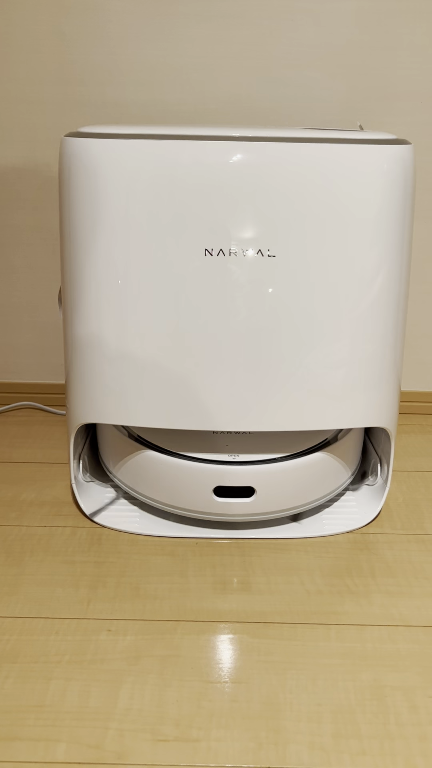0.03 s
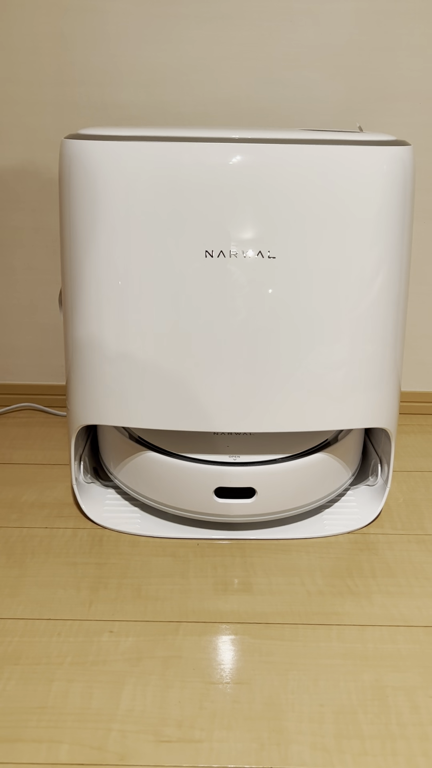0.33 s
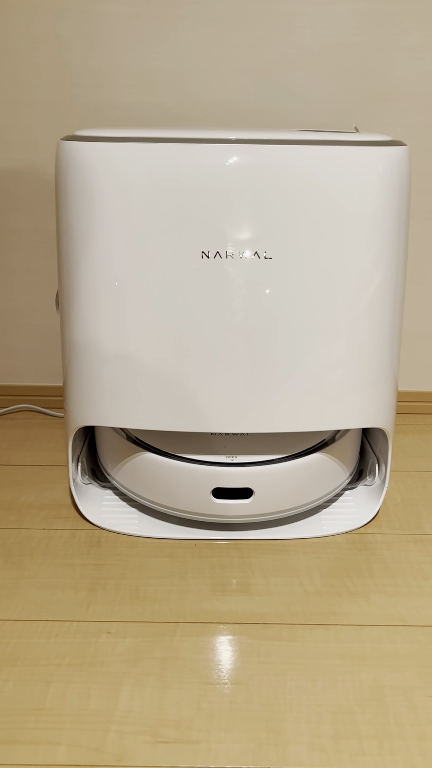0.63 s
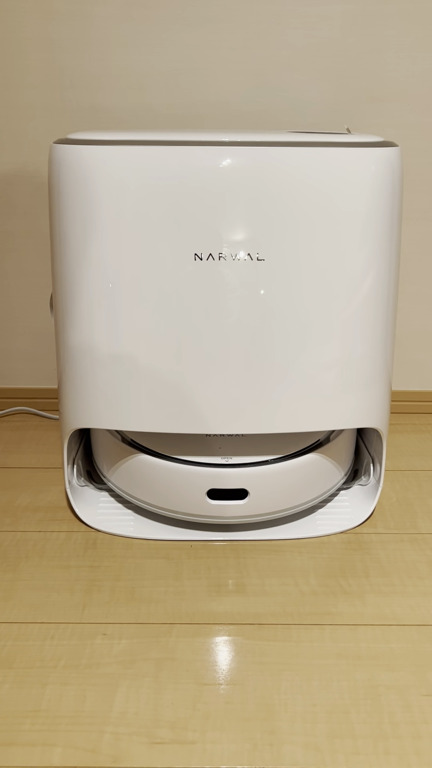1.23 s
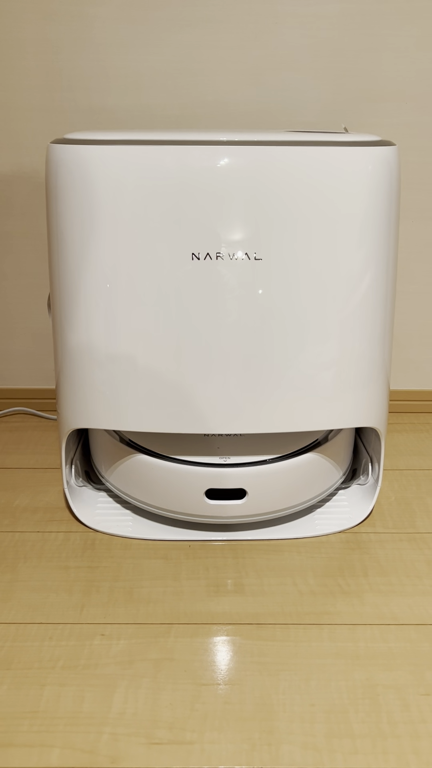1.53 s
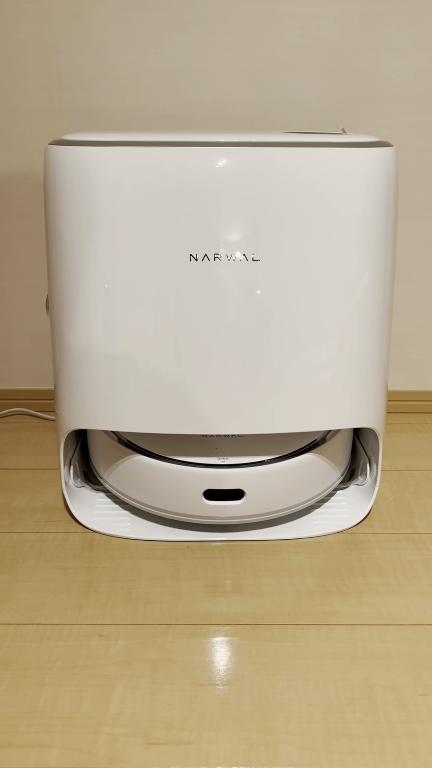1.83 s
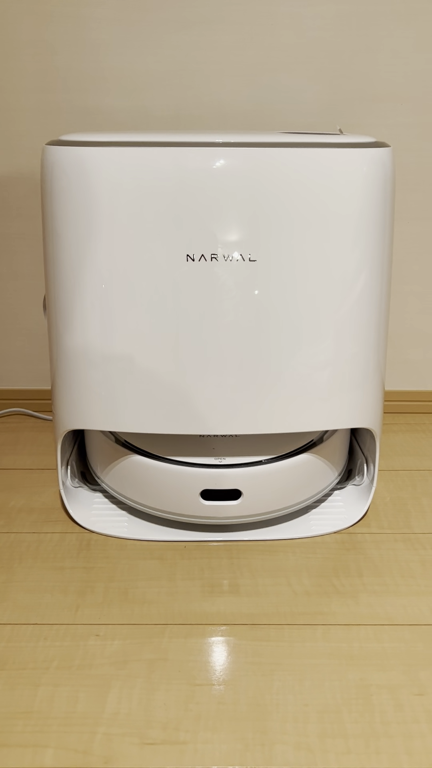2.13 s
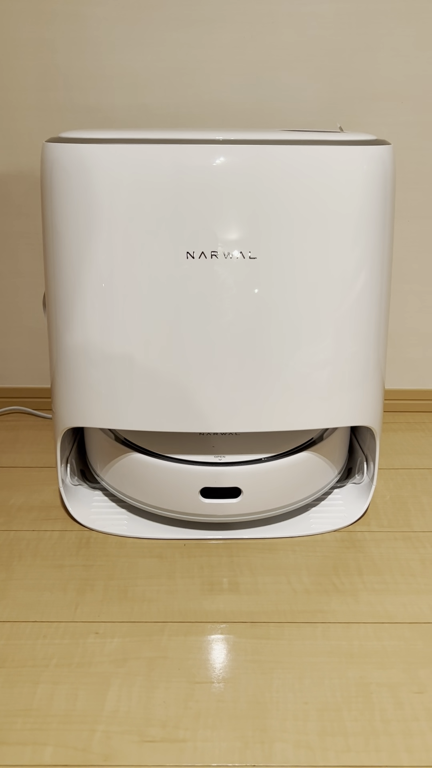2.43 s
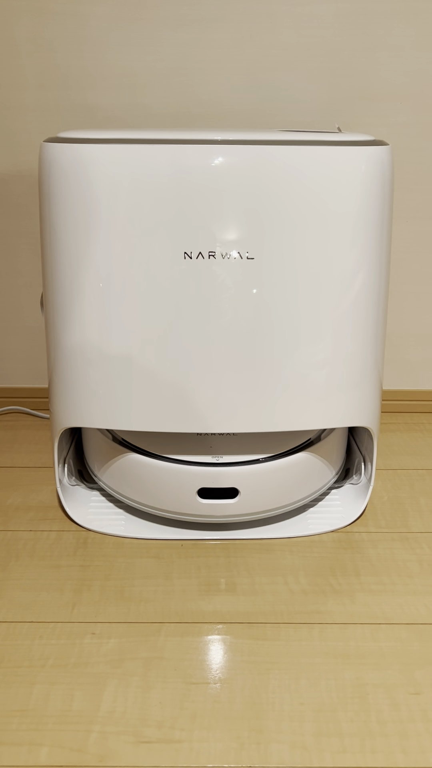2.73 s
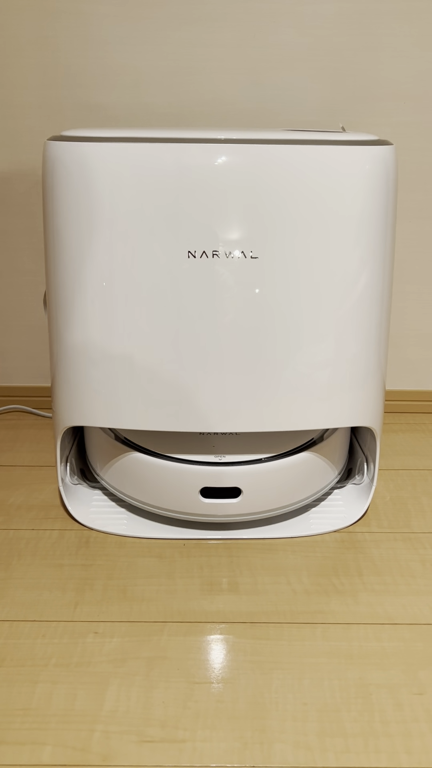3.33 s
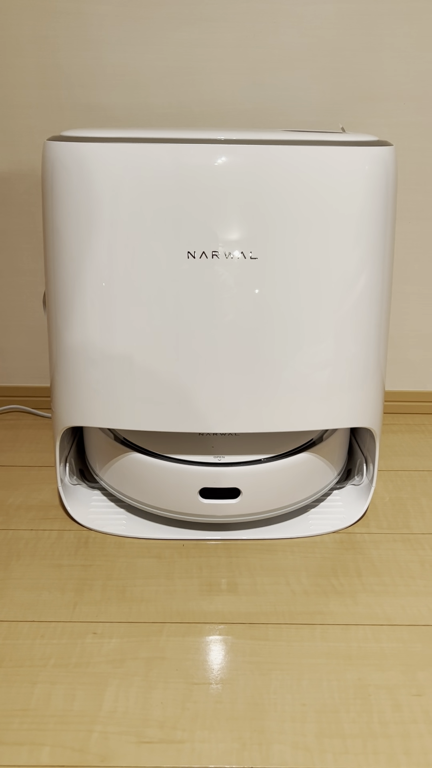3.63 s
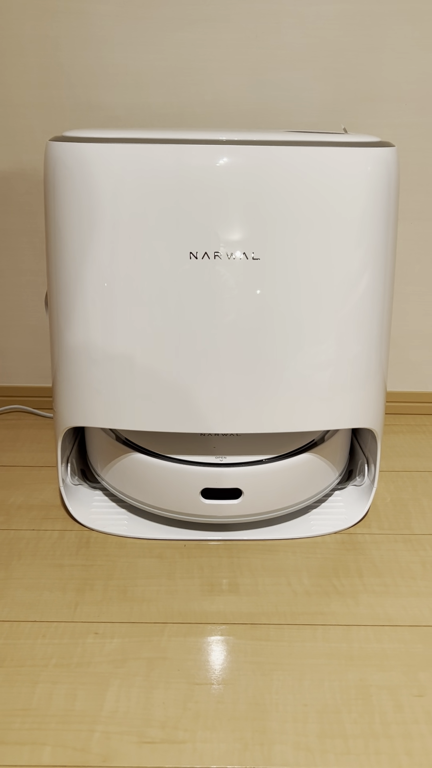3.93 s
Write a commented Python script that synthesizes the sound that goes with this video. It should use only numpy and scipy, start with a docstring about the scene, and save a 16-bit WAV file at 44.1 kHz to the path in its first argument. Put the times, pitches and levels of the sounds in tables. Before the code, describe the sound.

A robot vacuum's dock winds down with falling fan whines and a dying rush of air. Two plastic clunks follow, then a small pump whines and fizzes as water rumbles louder into a hollow tank in a quiet room.

```python
"""Falling whines over a dying rush of air: two fans coast down in a robot vacuum's dock, their tones
lighting up the resonances of the duct. An early knock and, as the fans stop, two clunks ring the plastic
shell. A small pump motor starts up with whining gears and fizzing brushes, and water rumbles ever louder
into a hollow tank, bubbling and splashing. A quiet room lies underneath."""
import sys
import numpy as np
from scipy import signal
from scipy.io import wavfile
from scipy.ndimage import uniform_filter1d, map_coordinates

SR = 44100
rng = np.random.default_rng(int(sys.argv[2]) if len(sys.argv) > 2 else 0)


def master(y):
    """Save y as 16-bit WAV."""
    cut = np.clip(np.atleast_2d(y).T, -1, 1)
    pcm = np.round(cut * 32767)  # scale
    wavfile.write(sys.argv[1], SR, pcm.astype(np.int16))


N = 176400
T = np.arange(N) / SR

# first fan coasting down: t/s, speed/(turns/s)
FAN_SPEED = [(0, 470), (.15, 420), (.3, 379), (.5, 337), (.7, 299), (.9, 274), (1.1, 236), (1.2, 218),
             (1.4, 184), (1.6, 150), (1.8, 118.3), (1.9, 104.5), (2.1, 82)]
# duct resonances that each fan's harmonics sweep through: harmonic, f/Hz, width/Hz, level/dB
FIRST_FAN_TONES = [(5, 1690, 110, -64.5), (5, 1440, 28, -64), (5, 1385, 70, -53.5), (5, 1308, 83, -63),
                   (5, 716, 190, -71.5), (6, 1362, 176, -66.5), (9, 3500, 500, -68.5), (9, 3130, 260, -66),
                   (9, 2660, 700, -76.5), (9, 2070, 380, -73.5), (9, 1696, 81, -68), (9, 1140, 290, -73.5),
                   (14, 3130, 380, -77.5), (14, 1356, 180, -73.5), (18, 7000, 760, -79),
                   (18, 5300, 520, -82), (18, 4380, 690, -88), (18, 3780, 290, -81), (18, 3440, 300, -80),
                   (18, 3116, 260, -73.5), (18, 2130, 270, -74.5), (27, 3160, 700, -86)]
SECOND_FAN_TONES = [(9, 3500, 280, -70.5), (9, 3130, 620, -69), (9, 1660, 190, -72.5), (9, 1403, 74, -63),
                    (9, 1311, 70, -62)]
# fades of the air rush, suction hiss and bearings: t/s, level/dB
RUSH_FADE = [(0, -51.5), (.2, -54), (.5, -57), (.9, -61), (1.2, -67.5), (1.5, -74), (1.9, -76),
             (2.2, -78.5), (2.4, -120)]
HISS_FADE = [(0, -59), (.13, -58), (.17, -62.5), (.3, -68.5), (.5, -76.5), (1.2, -120)]
BEARING_FADE = [(0, -65), (.5, -74.5), (1.1, -80), (1.95, -90), (2.2, -110)]
# colours of the rush, hiss and room tone: f/Hz, gain/dB
RUSH_COLOUR = [(45, -16), (75, 4.5), (110, -4), (240, 7), (340, -4), (520, 8), (640, -2), (900, 3.5),
               (1300, -3.5), (1900, -13), (3100, -9.5), (4300, -37), (9000, -23.5)]
HISS_COLOUR = [(1500, -9), (2600, 6), (3700, -4), (4800, -6), (6000, 0.5), (8000, -1.5), (10000, -4.5),
               (12500, 2.5)]
ROOM_COLOUR = [(25, 1), (50, 11.5), (80, 7), (130, 3), (300, -10), (900, -40), (2000, -8), (4000, -23.5),
               (8000, -22), (12500, -23)]
# bearing resonances, per filter pass: f/Hz, width/Hz, gain/dB
BEARING_RINGS = [(8145, 350, -1), (8794, 230, -0.95)]

# plastic contacts: t/s, relative level/dB, low-pass/Hz, low cut/Hz, tick gain/dB
CONTACTS = [(.329, -38, 1100, 298, -45), (2.012, -33, 1370, 425, -22.5), (2.019, -34.5, 1050, 285, -26),
            (2.0322, -33.5, 670, 280, -35), (2.2196, -41.5, 870, 230, -42), (2.221, -29, 294, 122, -64)]
# modes of the shell: f/Hz, gain/dB, t60/s
SHELL_MODES = [(158, -9, 0.13), (256, 0, 0.06), (329, -2.5, 0.106), (393, -7.5, 0.11), (521, -2.5, 0.075),
               (612, -7, 0.11), (693, -2.5, 0.056), (842, -6, 0.09), (924, -5, 0.072), (1040, -5.5, 0.058),
               (1247, -4, 0.03), (1597, -13, 0.06), (2260, -15, 0.032)]

# pump motor: t/s, speed/(turns/s)
PUMP_SPEED = [(2.21, 84), (2.26, 91), (2.316, 92.6), (2.43, 90), (2.48, 92), (2.53, 96), (2.62, 99),
              (2.7, 97.3), (2.82, 93.6), (2.99, 90), (3.15, 88.4), (3.3, 87.7), (3.5, 88), (4, 87)]
# envelopes of the gear whine and brush fizz: t/s, level/dB
WHINE_LEVEL = [(2.22, -83), (2.31, -60.5), (2.45, -61), (2.53, -68.5), (2.62, -85), (2.69, -63),
               (2.82, -74), (2.9, -66), (3, -59.5), (3.25, -60), (3.47, -61), (3.6, -64), (3.72, -75)]
FIZZ_LEVEL = [(2.2, -69), (2.6, -66.5), (3.1, -69.5), (3.65, -69), (3.8, -75.5), (4, -103)]
# shaft tones: harmonic, level/dB
SHAFT_TONES = [(1, -82), (5, -75.5), (6, -73), (9, -75), (13, -84.5), (21, -81), (22, -92)]
# resonance that a high overtone reaches near top speed: f/Hz, width/Hz, level/dB
SING_RESONANCE = [(3843, 60, -75.5)]
# motor casing resonances: f/Hz, width/Hz, gain/dB
CASING_RINGS = [(2360, 980, -8.5), (3860, 45, 0.5), (4710, 120, -5), (5090, 100, 1.5), (5580, 400, 0),
                (6510, 155, 2), (7770, 380, 4), (9210, 200, -12), (11100, 540, -15.5)]

# swells of the water's rumble and splash: t/s, level/dB
RUMBLE_SWELL = [(2.2, -110), (2.26, -63.5), (2.4, -72.5), (2.55, -70), (2.8, -73.5), (3.02, -65),
                (3.12, -50), (3.2, -55), (3.33, -48.5), (3.52, -47.5), (3.7, -42), (4, -41.5)]
SPLASH_SWELL = [(2.2, -110), (2.27, -71), (2.95, -69), (3.12, -62.5), (3.22, -62), (3.35, -59.5),
                (3.75, -56), (4, -54)]
# their colours: f/Hz, gain/dB
RUMBLE_COLOUR = [(38, -31), (55, -5), (78, -2), (100, 1.5), (135, -1), (200, -2), (280, 1.5), (350, -2),
                 (480, -7.5), (700, -16.5), (1400, -27.5)]
SPLASH_COLOUR = [(300, -24), (550, 0.5), (900, 1), (1400, -4.5), (2000, -10), (3000, -10.5), (4200, -21),
                 (6500, -22), (9000, -36), (12500, -22.5)]

# stereo image of the noise beds: f/Hz, left-right correlation
LIKENESS = [(60, .985), (125, .9), (250, .78), (500, .6), (1000, .65), (4000, .7), (7500, .75), (9500, -.2),
            (11500, -.8)]
# their balance: f/Hz, left minus right/dB
AIR_BALANCE = [(100, 0.75), (500, 3.8), (2000, 4.2), (5000, 0.83), (9000, 0.57)]
WATER_BALANCE = [(100, 0.24), (250, 0.57), (600, 3), (2000, 3.9), (8000, 0.74)]

SECOND_FAN_RATIO, FAN_STOP_S, TURBULENCE_TURNS = 1.052, 2.03, .035
CRACK_DB, CRACK_T60_S, TICK_T60_S = 2.5, .091, .16
PUMP_START_S, PUMP_RISE_S, GEAR_TEETH, COMMUTATOR_SEGMENTS = 2.215, .04, 11, 3
BRUSH_BOUNCE_TURNS, FAN_FLUTTER_DB, PUMP_FLUTTER_DB = .0003, 2.5, 6
BUBBLES_PER_S, BUBBLE_T60_CYCLES, BUBBLE_DB, CHURN_DB = 92, 12, -4.5, -1.5
ROOM_TONE_DB, ROOM_T60_S, ROOM_WET_DB = -74.5, .26, -7.5


def from_db(db):
    return 10 ** (np.asarray(db) / 20)


def unit_rms(x):
    return x / np.sqrt(np.mean(x ** 2) + 1e-20)


def in_time(rows):
    return np.interp(T, *np.transpose(rows))


def at_hz(rows, hz):
    freqs, values = np.transpose(rows)
    return np.interp(np.log(hz), np.log(freqs), values)


def pan(db):
    return from_db(np.array([[db], [-db]]) / 2)


def decay(t, t60):
    return np.exp(-np.log(1000) * t / t60)


def butter(x, hz, kind, order=2):
    sos = signal.butter(order, np.clip(hz, 10, .45 * SR), kind, fs=SR, output="sos")
    return signal.sosfilt(sos, x + 1e-18)


def drift(hz):
    """Smooth random modulator of rms 1, rolling off above hz."""
    hop, settle = 40, 2000
    pole = np.exp(-2 * np.pi * hz * hop / SR)
    white = rng.standard_normal(N // hop + settle + 2)
    slow = signal.lfilter([1], [1, -2 * pole, pole * pole], white)[settle:]
    return np.interp(np.arange(N) / hop, np.arange(len(slow)), unit_rms(slow))


def ring(clicks, hz, t60):
    """Each click sets a damped sine ringing."""
    r, w = decay(1 / SR, t60), 2 * np.pi * hz / SR
    return signal.lfilter([0, np.sin(w)], [1, -2 * r * np.cos(w), r * r], clicks + 1e-18)


def resonate(x, rows):
    """Parallel resonators of alternating polarity."""
    return sum((-1) ** k * from_db(db) * signal.lfilter(*signal.iirpeak(hz, hz / width, fs=SR), x)
               for k, (hz, width, db) in enumerate(rows))


def stereo_noise(pair, alike):
    """Two unrelated noises, mixed as mid and side to a given correlation."""
    mid, side = pair
    return np.sqrt(1 + alike) * mid + np.sqrt(1 - alike) * side * np.array([[1], [-1]])


def noise_bed(colour, balance, flicker_db, flicker_hz):
    """Stereo noise in narrow bands, each flickering partly on its own; mid rms 1."""
    edges = np.geomspace(colour[0][0], colour[-1][0], 2 * len(colour) + 1)
    out, together, white = 0, drift(flicker_hz), rng.standard_normal((2, 2, N))
    for k, band in enumerate(zip(edges, edges[1:])):
        hz = np.sqrt(band[0] * band[1])
        gain = from_db(at_hz(colour, hz) + flicker_db * (.5 * together + drift(flicker_hz)))
        noise = stereo_noise(butter(white[k % 2], band, "band", order=3), at_hz(LIKENESS, hz))
        out += gain * pan(at_hz(balance, hz)) * noise
    return out / np.std(out.mean(axis=0))


def shaft_turns(speed, wobble):
    """Shaft angle in turns, slightly unsteady."""
    return np.cumsum(speed * (1 + wobble * drift(33.7))) / SR


def tone(turns, harmonic):
    return np.sqrt(2) * np.sin(2 * np.pi * (harmonic * turns + rng.random()))


def in_room(x, wet_db):
    """Direct sound plus a short diffuse tail, different on each side."""
    t = T[:SR // 2]
    tail = rng.standard_normal((2, len(t))) * decay(t, ROOM_T60_S) * (t > .004)
    tail /= np.sqrt(np.sum(tail ** 2, axis=1, keepdims=True))
    return x + from_db(wet_db) * signal.fftconvolve(x[None], tail, axes=1)[:, :N]


def fan_tones():
    """Falling tones swell as they cross the duct's resonances; turbulence smears them at high speed."""
    out = 0
    for ratio, resonances in ((1, FIRST_FAN_TONES), (SECOND_FAN_RATIO, SECOND_FAN_TONES)):
        speed = ratio * in_time(FAN_SPEED)
        turns = shaft_turns(speed, wobble=.00205)
        turns += TURBULENCE_TURNS * (speed / speed.max()) ** 4 * drift(83)
        for harmonic in sorted({row[0] for row in resonances}):
            swell = sum(from_db(db) / (1 + ((harmonic * speed - hz) / width) ** 2) ** 4
                        for k, hz, width, db in resonances if k == harmonic)
            out += swell * tone(turns, harmonic) * from_db(FAN_FLUTTER_DB * drift(7.6))
    fade_out = np.clip((FAN_STOP_S - T) / .017, 0, 1)
    return pan(db=5) * in_room(out * fade_out, wet_db=-6)


def fan_air():
    """The rush of air and the suction hiss die away with the fans."""
    rush = noise_bed(RUSH_COLOUR, AIR_BALANCE, flicker_db=.9, flicker_hz=30)
    hiss = noise_bed(HISS_COLOUR, AIR_BALANCE, flicker_db=1.8, flicker_hz=12)
    return from_db(in_time(RUSH_FADE)) * rush + from_db(in_time(HISS_FADE)) * hiss


def fan_bearings():
    """The bearings sing in a high, narrow band that shimmers as it fades."""
    noise = stereo_noise(rng.standard_normal((2, N)), alike=.69)
    singing = resonate(resonate(noise, BEARING_RINGS), BEARING_RINGS)
    return from_db(in_time(BEARING_FADE) + 2.14 * drift(36)) * unit_rms(singing)


def room_tone():
    """A faint, bass-heavy bed under everything."""
    return from_db(ROOM_TONE_DB) * noise_bed(ROOM_COLOUR, AIR_BALANCE, flicker_db=-.5, flicker_hz=20)


def clunks():
    """Each contact rings the plastic shell, with a short crack and a faint bright tick."""
    out, t = 0, T[:SR // 2]
    click = 1. * (t == 0)
    body = sum((-1) ** k * from_db(db) * ring(click, hz, t60)
               for k, (hz, db, t60) in enumerate(SHELL_MODES))
    for start_s, db, soft_hz, cut_hz, tick_db in CONTACTS:
        white = rng.standard_normal(len(t))
        crack = from_db(CRACK_DB) * white * decay(t, CRACK_T60_S)
        tick = from_db(tick_db) * white * decay(t, TICK_T60_S)
        thud = butter(body + crack, soft_hz, "low")
        hit = butter(thud + tick, cut_hz, "high", order=3)
        out += from_db(db - 9) * np.pad(hit, (int(start_s * SR), N))[:N]
    return pan(db=3.5) * in_room(out, ROOM_WET_DB)


def pump_whine(turns):
    """Meshing gears whine over fluttering shaft tones; a high overtone sings near top speed."""
    gears = from_db(in_time(WHINE_LEVEL)) * tone(turns, GEAR_TEETH)
    shaft = sum(from_db(db + PUMP_FLUTTER_DB * drift(34)) * tone(turns, k) for k, db in SHAFT_TONES)
    overtone = resonate(tone(turns, harmonic=39), SING_RESONANCE)
    return pan(db=5.5) * in_room(gears + shaft + overtone, wet_db=-14)


def brush_track(turns):
    """A rough ring of the commutator, scraped once a turn, with slowly changing contact."""
    roughness = rng.standard_normal((2, 300))
    scrape = [map_coordinates(row, [turns % 1 * len(row)], order=3, mode="grid-wrap")
              for row in roughness]
    return drift(1) * np.array(scrape)


def brush_fizz(turns):
    """Bouncing brushes wander between three rough tracks and ring the motor casing."""
    scrape = sum(brush_track(turns + BRUSH_BOUNCE_TURNS * drift(66)) for _ in range(3))
    scrape /= np.sqrt(uniform_filter1d(scrape ** 2, size=900, axis=1) + 1e-9)  # even out the level
    scrape += .53 * rng.standard_normal((2, N))
    scrape *= 1 + .11 * np.cos(2 * np.pi * turns)  # one pulse a turn
    scrape *= 1 + .2 * np.cos(2 * np.pi * COMMUTATOR_SEGMENTS * turns)
    casing = resonate(stereo_noise(scrape, alike=.8), CASING_RINGS)
    return from_db(in_time(FIZZ_LEVEL)) * unit_rms(casing)


def pump():
    """The motor kicks in, one shaft driving both whine and fizz."""
    turns = shaft_turns(in_time(PUMP_SPEED), wobble=.00196)
    fade_in = np.clip((T - PUMP_START_S) / PUMP_RISE_S, 0, 1)
    return fade_in * (pump_whine(turns) + brush_fizz(turns))


def bubbles():
    """Large bubbles ring low in the tank, each at a random moment, strength and pitch."""
    births = rng.random(N) < BUBBLES_PER_S / SR
    strength_db = 4 * np.minimum(rng.exponential(1, N), 3)
    kicks = births * from_db(strength_db) * rng.choice([-1, 1], N)
    pitches_hz = np.geomspace(125.7, 315, 20)
    pick = rng.integers(0, len(pitches_hz), N)
    rings = sum(ring(kicks * (pick == k), hz, BUBBLE_T60_CYCLES / hz) for k, hz in enumerate(pitches_hz))
    return unit_rms(in_room(butter(rings, hz=90.5, kind="high"), ROOM_WET_DB))


def water():
    """Bubbles and churn build to a rumble in the tank, with splashing on top."""
    bubbling = from_db(BUBBLE_DB) * bubbles()
    churn = from_db(CHURN_DB) * noise_bed(RUMBLE_COLOUR, WATER_BALANCE, flicker_db=1.5, flicker_hz=34)
    splash = noise_bed(SPLASH_COLOUR, WATER_BALANCE, flicker_db=1.5, flicker_hz=77)
    return from_db(in_time(RUMBLE_SWELL)) * (bubbling + churn) + from_db(in_time(SPLASH_SWELL)) * splash


def scene():
    """The dock over the quiet of the room."""
    return fan_tones() + fan_air() + fan_bearings() + room_tone() + clunks() + pump() + water()


def record(dry):
    """The microphone has a narrow dip; the top is cut steeply."""
    dip_hz, dip_width_hz, cutoff_hz = 4960, 220, 12600
    notched = signal.lfilter(*signal.iirnotch(dip_hz, dip_hz / dip_width_hz, fs=SR), dry)
    return signal.sosfilt(signal.ellip(10, .2, 70, cutoff_hz, fs=SR, output="sos"), notched)


dry = scene()
out = record(dry)
master(out)
```